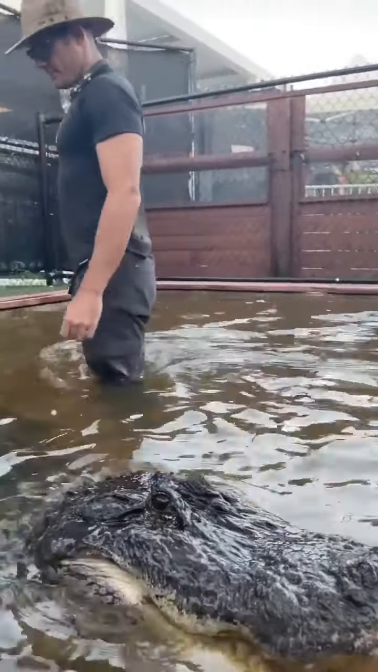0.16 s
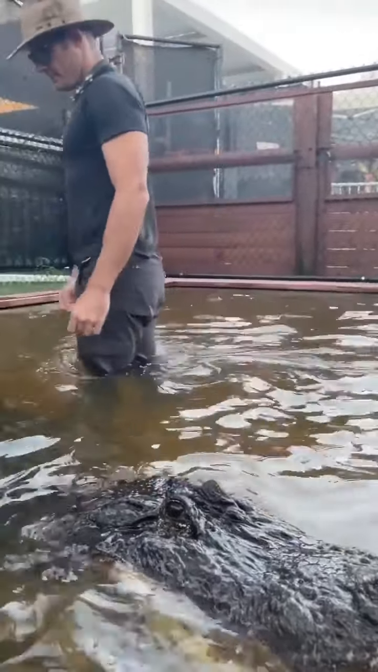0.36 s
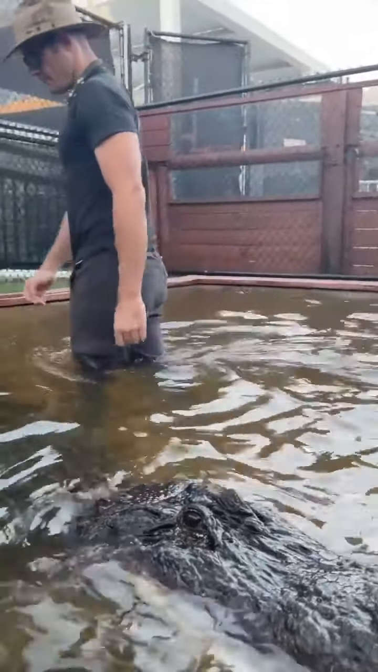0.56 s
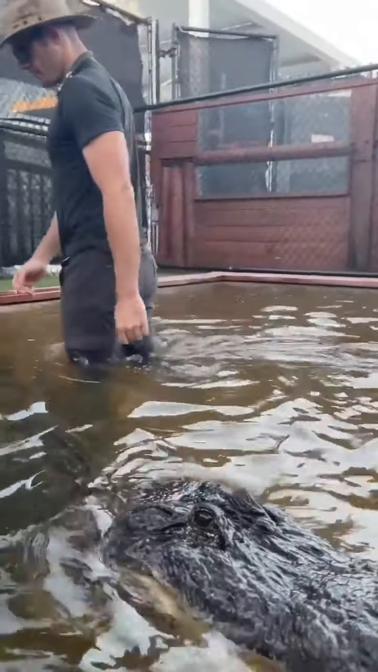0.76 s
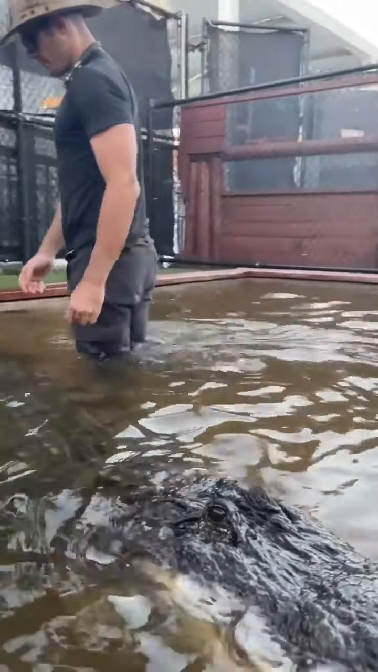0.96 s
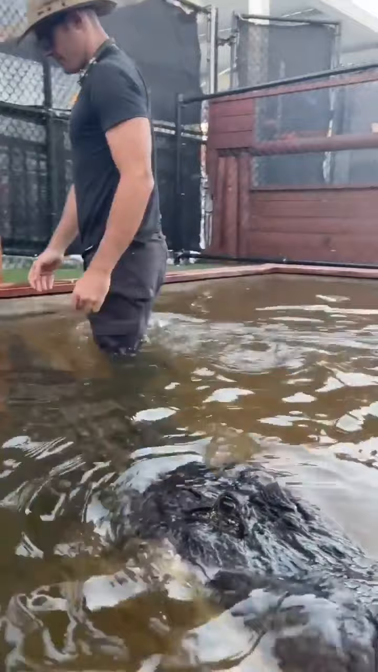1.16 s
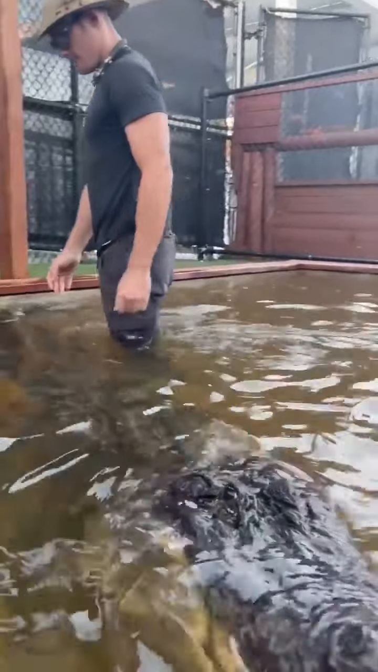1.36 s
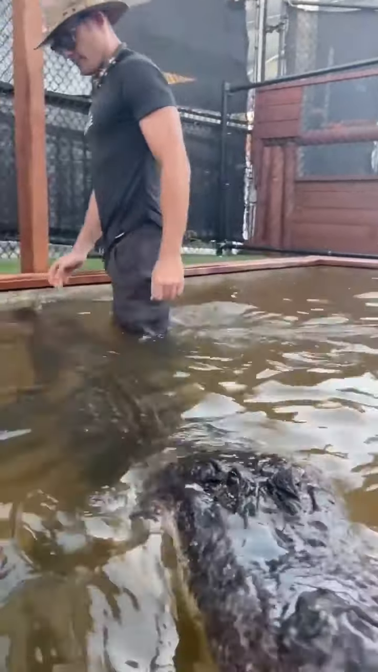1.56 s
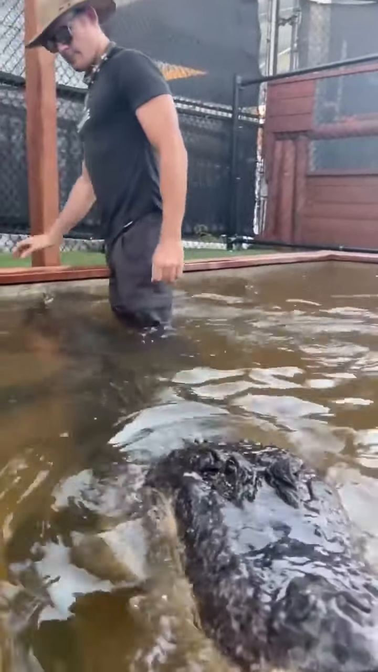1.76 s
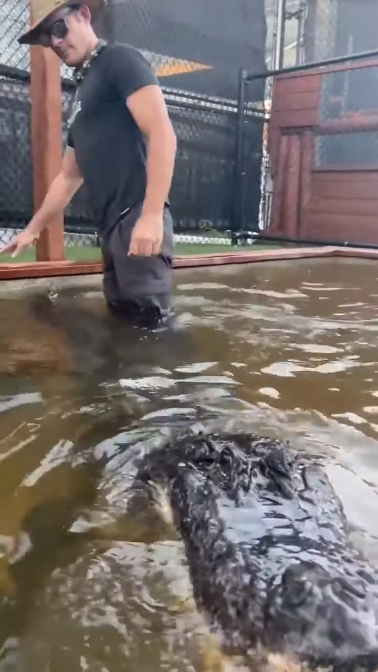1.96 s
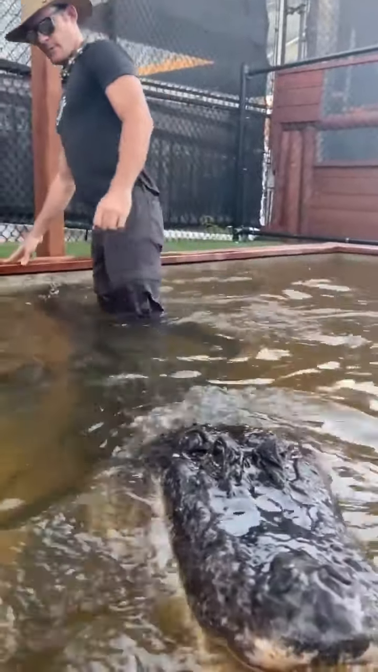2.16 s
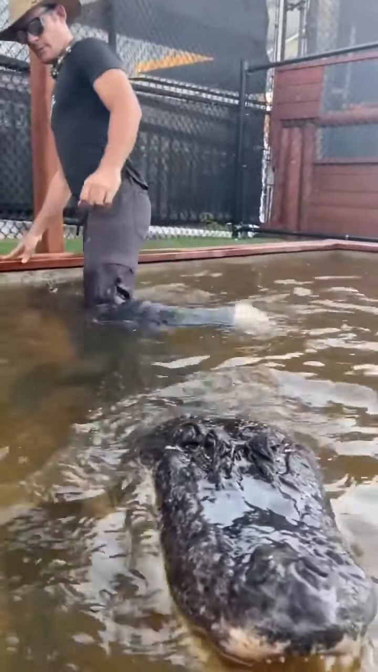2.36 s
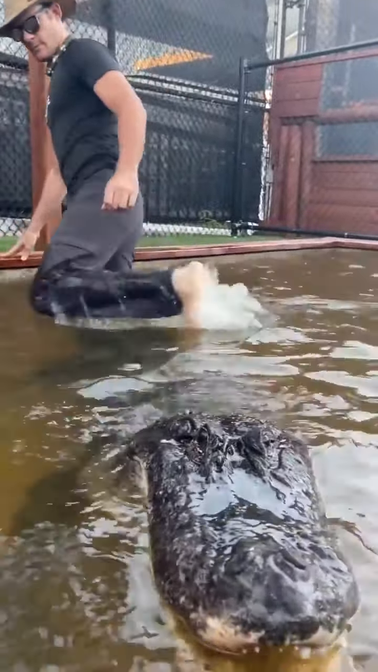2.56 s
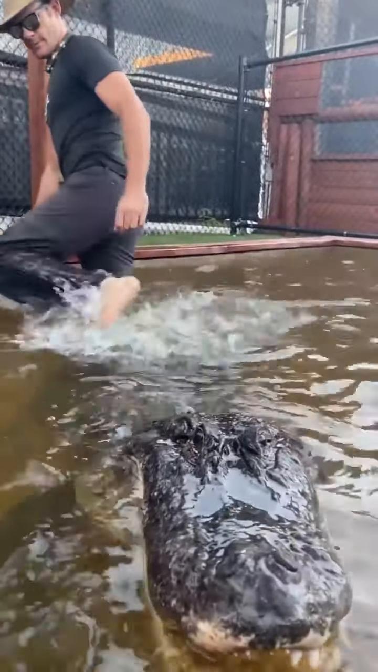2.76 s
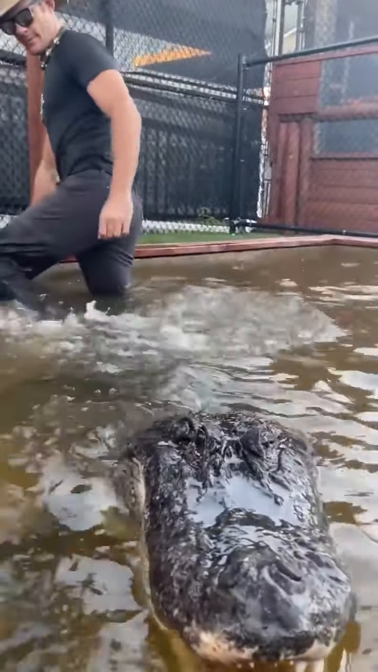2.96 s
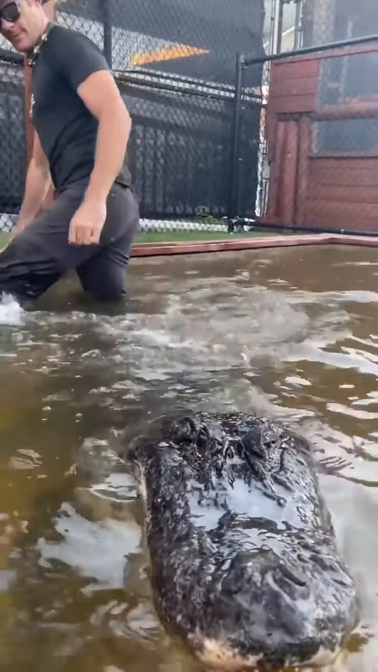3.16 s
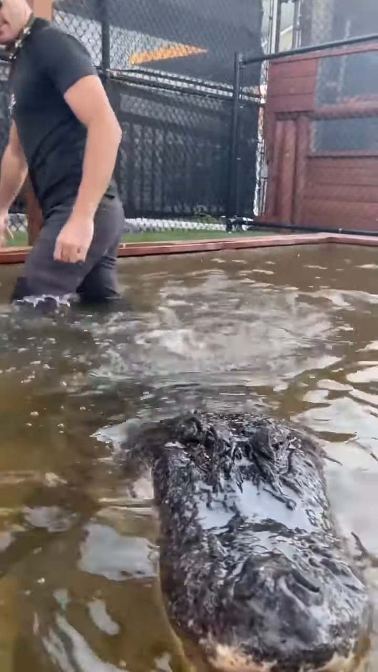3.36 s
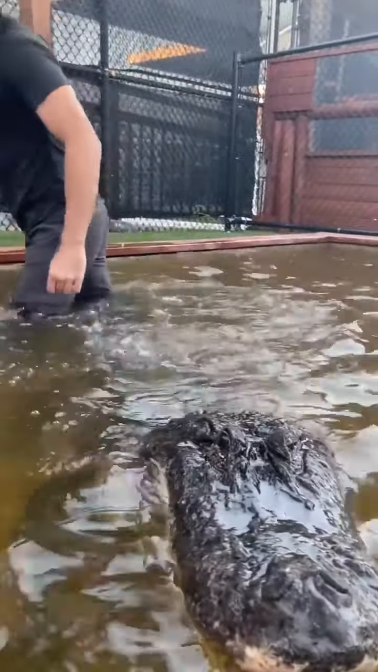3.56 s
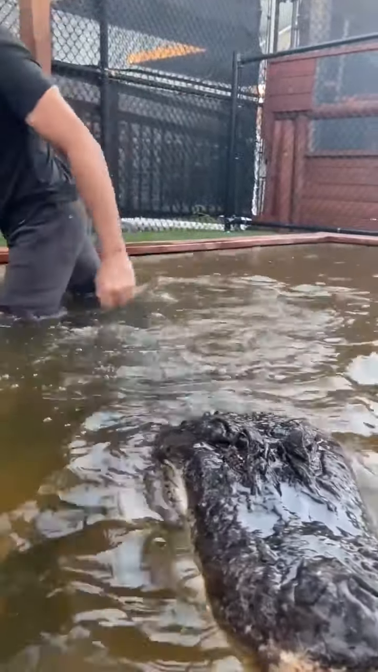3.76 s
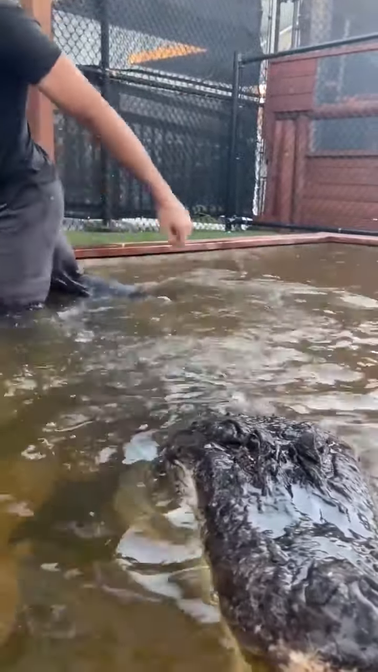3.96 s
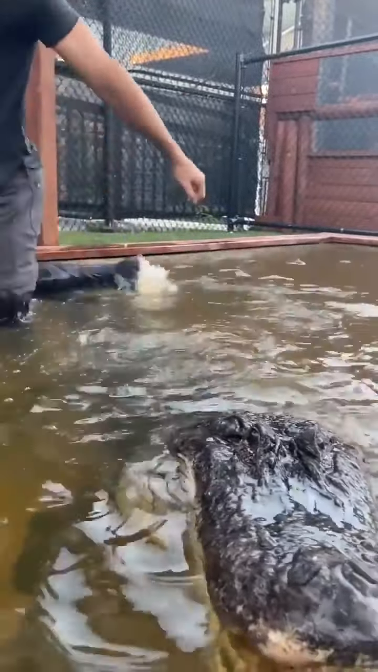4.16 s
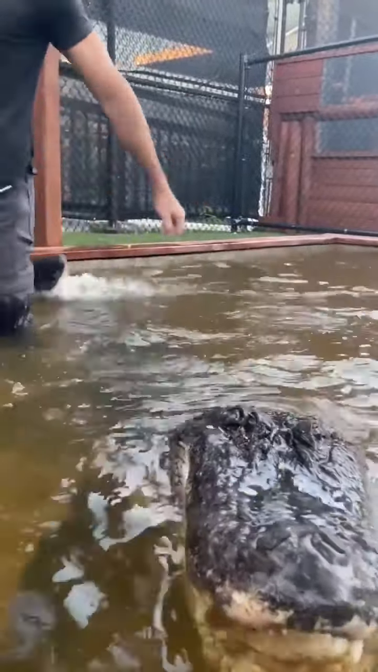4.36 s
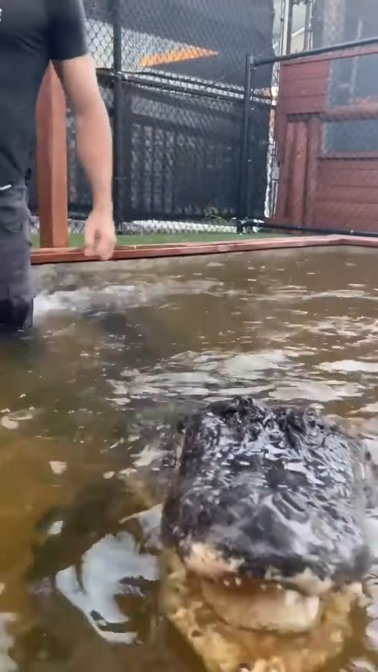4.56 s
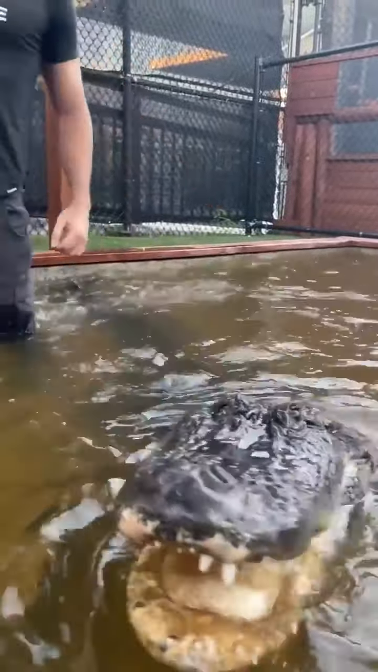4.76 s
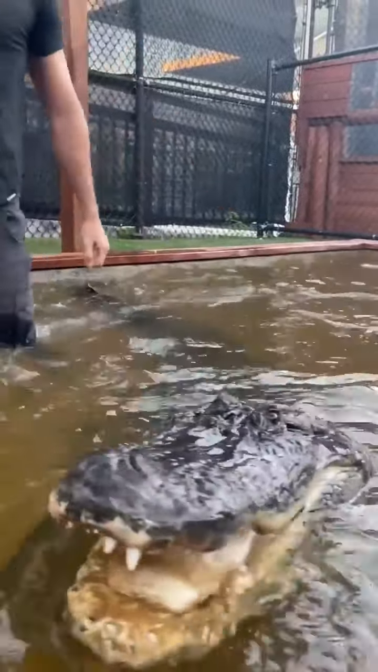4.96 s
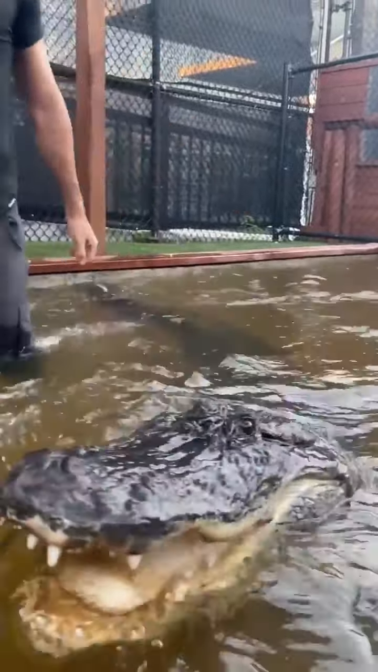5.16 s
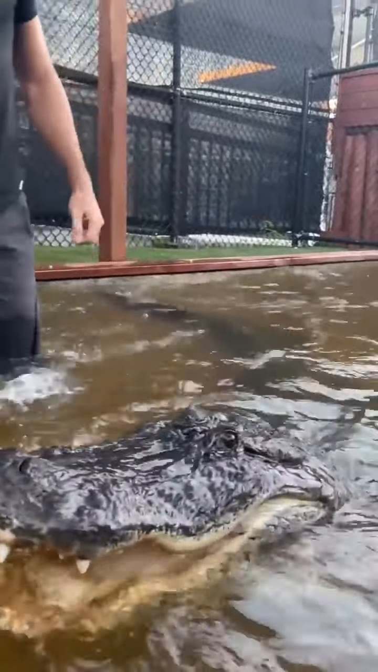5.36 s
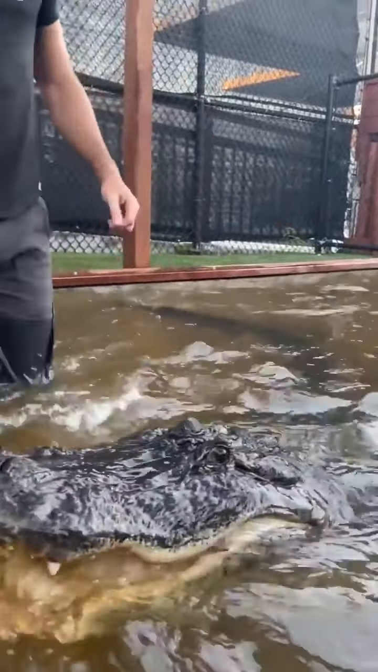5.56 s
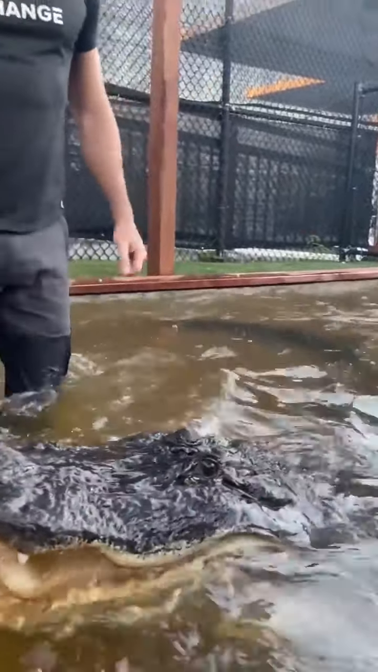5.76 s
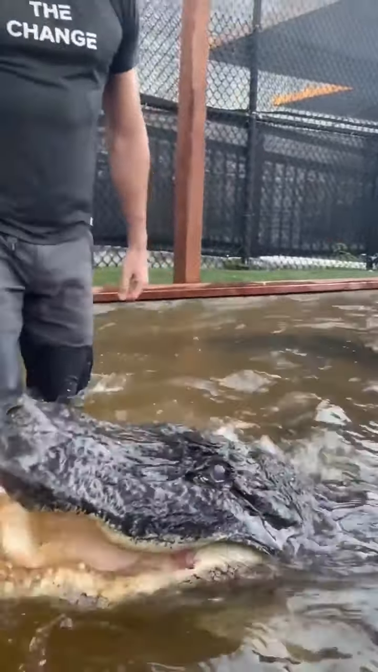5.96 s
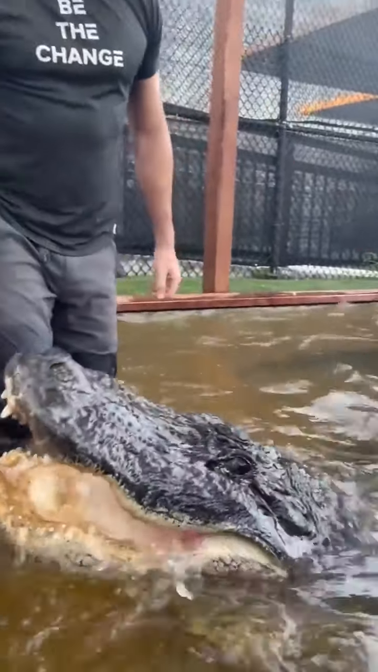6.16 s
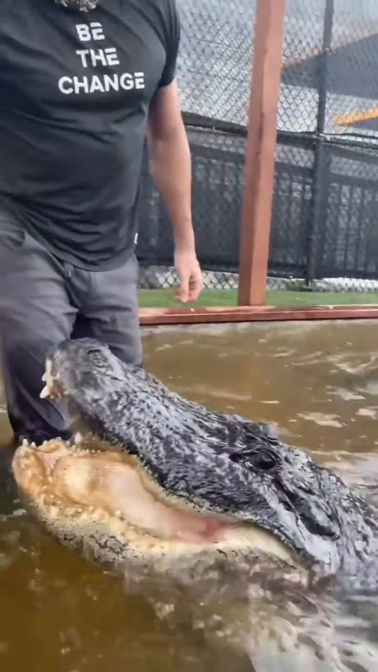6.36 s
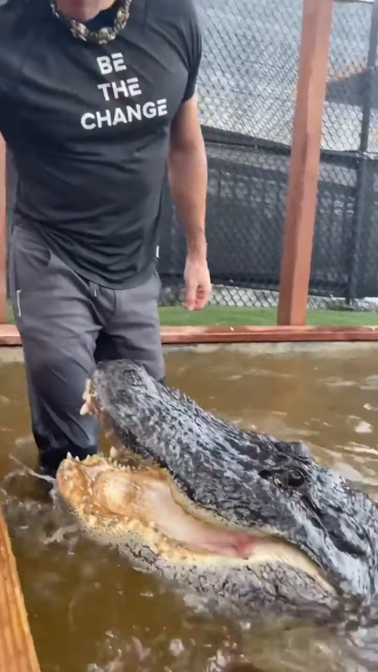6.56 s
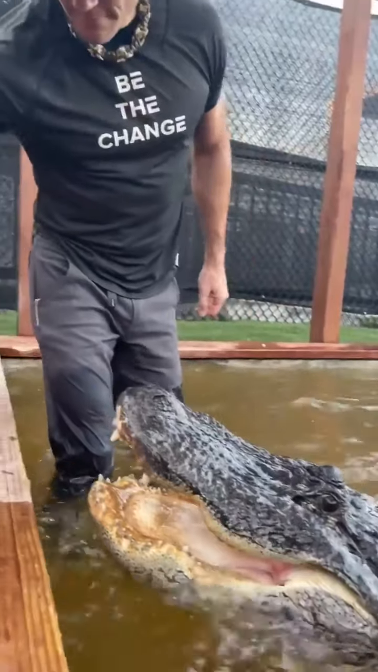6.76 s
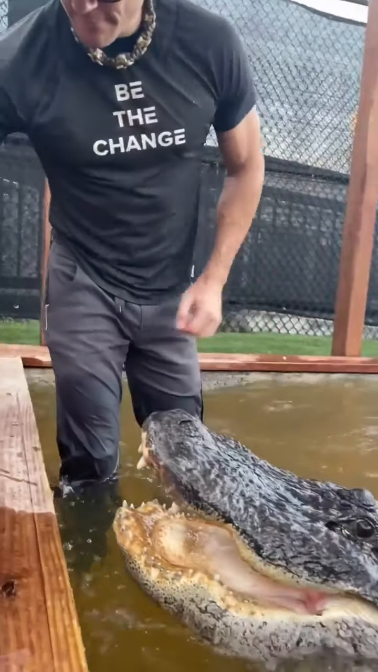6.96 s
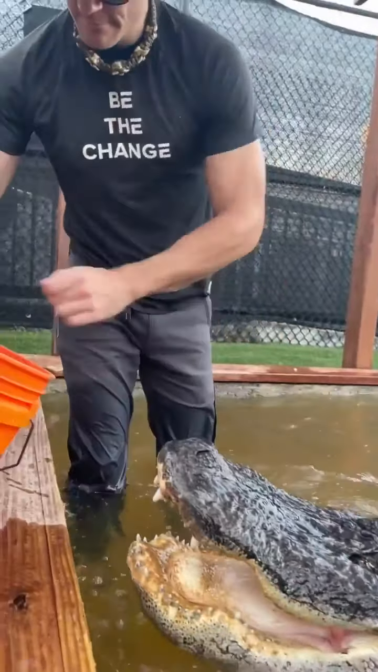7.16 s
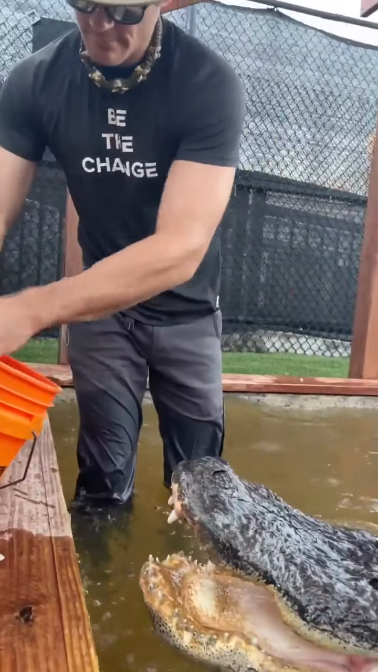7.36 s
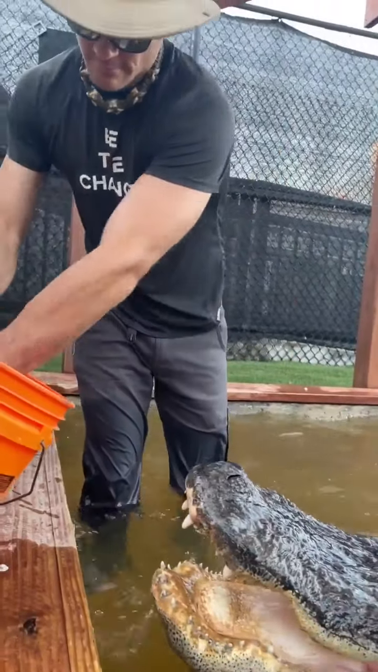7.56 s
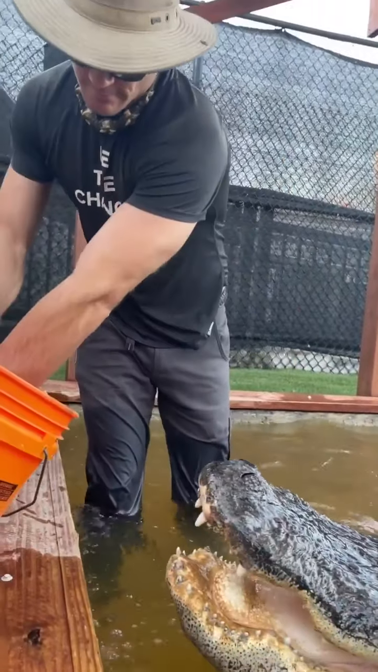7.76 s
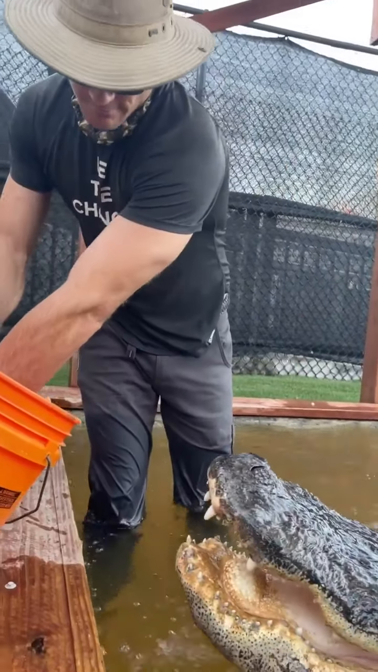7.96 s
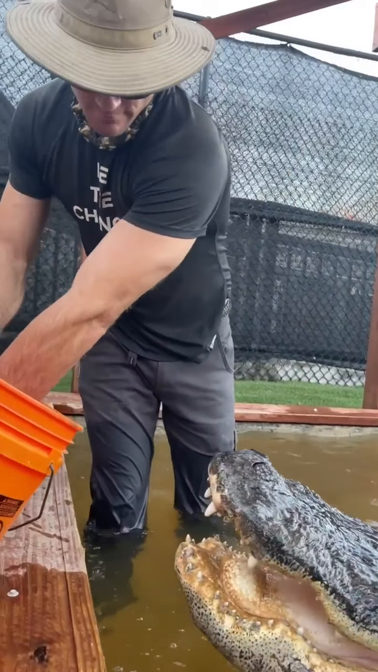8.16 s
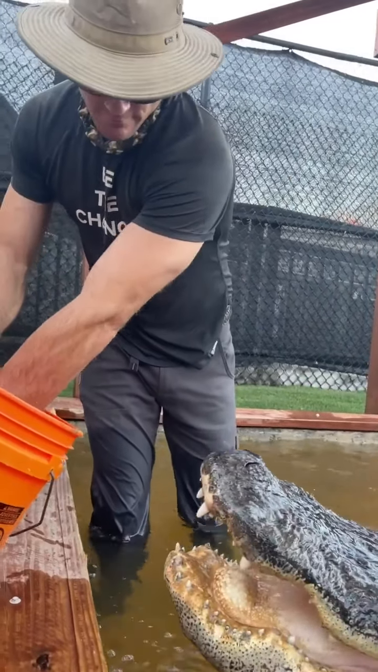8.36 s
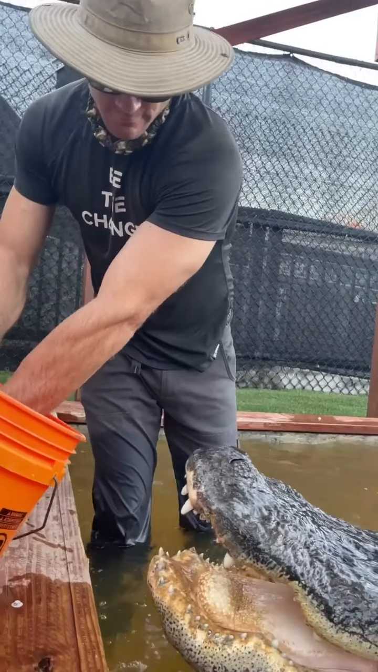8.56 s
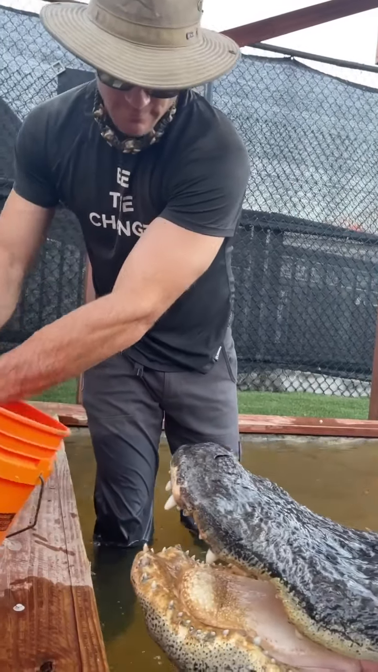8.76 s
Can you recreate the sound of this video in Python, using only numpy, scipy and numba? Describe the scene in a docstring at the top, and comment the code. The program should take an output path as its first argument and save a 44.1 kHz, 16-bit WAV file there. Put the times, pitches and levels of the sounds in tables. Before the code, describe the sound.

Close water sloshes, gurgles and splashes as a person and a large reptile move in a pool, with two hollow knocks late on.

```python
"""Wading beside a large reptile

A person wades through a shallow outdoor pool beside a large reptile, a metre or two from a phone.
Moving legs and jaws stir up swarms of bubbles, fizz and spray; single slaps and drips ring trapped air.
Something hollow is knocked twice and a hand rustles in a bucket. Fence and pool walls add a short echo;
distant traffic and a motor rumble under a thin outdoor hiss."""
import sys
import numpy as np
from scipy import signal
from scipy.fft import rfft, irfft, next_fast_len
from scipy.io import wavfile
from scipy.ndimage import uniform_filter1d
from numba import njit

SR = 44100
rng = np.random.default_rng(int(sys.argv[2]) if len(sys.argv) > 2 else 0)


def wav_out(sig):
    """Save sig, one row per channel (or a flat mono array), as 16-bit PCM at SR to the path in sys.argv[1]."""
    wavfile.write(sys.argv[1], SR, np.round(np.clip(np.atleast_2d(sig).T, -1, 1) * 32767).astype(np.int16))


N = 388079
WATER_PAN_DB = -2  # left minus right: the bubbles sit a little to the right
ANTIPHASE = np.array([[1], [-1]])


def undb(db):
    """Decibels to gain."""
    return 10 ** (np.asarray(db) / 20)


def level(x, db):
    """Scale to an rms level."""
    return x * undb(db) / np.sqrt(np.mean(x ** 2))


def crest(x, db):
    """Scale a burst so that its loudest millisecond has this rms level."""
    return x * undb(db) / np.sqrt(uniform_filter1d(x ** 2, SR // 1000).max())


def colour(x, curve):
    """EQ through points of f/Hz, gain/dB, joined on a log-frequency axis."""
    size = next_fast_len(x.shape[-1])
    hz, db = np.transpose(curve)
    bin_hz = np.arange(size // 2 + 1) * SR / size
    gain = undb(np.interp(np.log(bin_hz + 1), np.log(hz), db))
    return irfft(rfft(x, size) * gain, size)[..., :x.shape[-1]]


def band(x, lo_hz, hi_hz, order=2):
    """Butterworth band-pass."""
    sos = signal.butter(order, [lo_hz, min(hi_hz, .45 * SR)], "band", fs=SR, output="sos")
    return signal.sosfilt(sos, x)


def drift(rate_hz):
    """Smooth random modulator: sample-and-hold, slewed twice, with a spread near 1."""
    hold = int(SR / rate_hz)
    steps = np.repeat(rng.standard_normal(N // hold + 1), hold)
    return 1.38 * uniform_filter1d(uniform_filter1d(steps, hold), hold)[:N]


@njit
def ring(onset_s, hz, t60, rise, left, right, lead_rad, attack):
    """Damped stereo sines; attack is a share of t60, rise the share the pitch climbs over t60."""
    out = np.zeros((2, N))
    for k in range(len(onset_s)):
        span, start = t60[k] * SR, int(onset_s[k] * SR)
        phasor = 1 + 0j
        step = np.exp(2j * np.pi * hz[k] / SR - np.log(1000) / span)
        bend = np.exp(2j * np.pi * hz[k] * rise[k] / SR / span)
        left_turn = np.exp(1j * lead_rad[k])
        for i in range(min(int(.8 * span), N - start)):
            tone = phasor * min(i / (attack * span), 1.)
            out[0, start + i] += left[k] * (tone * left_turn).imag
            out[1, start + i] += right[k] * tone.imag
            phasor *= step
            step *= bend
    return out


def traffic():
    """Distant traffic: a low mono rumble that barely swells."""
    # rumble spectrum: f/Hz, relative density/dB
    spectrum = [(13, -36), (28, -17), (45, 3), (90, -0.5), (130, -6.5), (210, -17.5), (320, -21),
                (500, -65)]
    return level(colour(rng.standard_normal(N), spectrum), db=-37) * undb(0.096 * drift(0.24))


def motor():
    """A distant motor hums one low tone that wavers in pitch and flutters in level."""
    hz = 95.4 * (1 + 0.01514 * drift(2.7))
    return np.sin(2 * np.pi * np.cumsum(hz) / SR) * undb(-45 + drift(28.0))


def outdoor_hiss():
    """A thin, wide bed of air that sways gently in level."""
    # hiss spectrum: f/Hz, relative density/dB
    spectrum = [(250, 4.5), (500, -6), (1000, -13.5), (2500, -9), (6000, -27), (13000, -22)]
    mid, side = colour(rng.standard_normal((2, N)), [(100, -36)] + spectrum)
    return level(mid + 1.3 * side * ANTIPHASE, db=-52.5) * undb(1.5 * drift(1.667))


def fence_echo(x, t60=0.11, predelay_s=.004, send_db=-7):
    """Fence and pool walls send back a short, dull, scattered echo, different on each side."""
    t = np.arange(int(.3 * SR)) / SR
    mid, side = rng.standard_normal((2, len(t)))
    tail = (mid + side * ANTIPHASE) * np.exp(-t * np.log(1000) / t60) * (t > predelay_s)
    tail /= np.sqrt(np.sum(tail ** 2, axis=1, keepdims=True))
    return undb(send_db) * signal.fftconvolve(band(x, 136, 3730, order=1), tail, axes=1)[:, :N]


def bucket(fade_s=0.013):
    """A hand scrapes unevenly, left of centre; the plastic wall adds one broad resonance."""
    # rustles: start/s, end/s, resonance/Hz, level/dB
    rustles = [(7.54, 7.68, 3580, -51), (8.272, 8.41, 2350, -59.5), (8.694, 8.817, 3480, -55)]
    out, t = 0, np.arange(N) / SR
    for start, end, hz, db in rustles:
        touch = np.clip(np.minimum(t - start, end - t) / fade_s, 0, 1) * undb(3.9 * drift(70))
        out = out + touch * level(band(rng.standard_normal(N), 0.84 * hz, 1.22 * hz), db)
    return out * undb([[1.5], [-1.5]])


def knocks():
    """Two knocks, the second a flam; each blow rings the same hollow body a little differently."""
    # blows: t/s, level/dB
    blows = [(6.928, -22), (6.974, -15), (6.981, -22)]
    # modes of the hollow body: f/Hz, gain/dB, t60/s
    modes = [(793, -11.5, 0.061), (1120, 0, 0.028), (1450, 2, 0.026), (1730, -3, 0.03), (2210, 1, 0.035),
             (2360, 0, 0.029), (2720, -10, 0.043)]
    hz, mode_db, t60 = np.tile(np.transpose(modes), len(blows))
    onset_s, blow_db = np.repeat(np.transpose(blows), len(modes), axis=1)
    detune, accent = rng.standard_normal((len(hz), 2)).T
    gain = undb(mode_db + blow_db + 2.5 * accent)
    zero = np.zeros(len(hz))
    return ring(onset_s, hz * (1 + 0.058 * detune), t60, zero, gain, gain, zero, attack=0.025)


def bloops():
    """Cavities fill and close: each note swells and fades as it sweeps up, evenly in octaves."""
    # closing cavities: t/s, length/s, first f/Hz, last f/Hz, peak/dB
    cavities = [(0.801, 0.027, 1110, 1640, -36.5), (1.035, 0.044, 597, 2210, -42),
                (1.242, 0.026, 930, 1650, -33.5), (1.336, 0.032, 952, 2020, -37.5),
                (2.467, 0.08, 291, 423, -29.5), (2.837, 0.03, 595, 915, -29.5),
                (5.323, 0.026, 1140, 1453, -29), (7.495, 0.04, 523, 1870, -42.5)]
    out = np.zeros(N)
    for onset_s, length_s, first_hz, last_hz, db in cavities:
        progress = np.linspace(0, 1, int(length_s * SR))
        hz = first_hz * (last_hz / first_hz) ** progress
        envelope = undb(db) * np.sin(np.pi * progress) ** .5
        i = int(onset_s * SR)
        out[i:i + len(hz)] += envelope * np.sin(2 * np.pi * np.cumsum(hz) / SR)
    return out * undb([[WATER_PAN_DB / 2], [-WATER_PAN_DB / 2]])


def air_pockets():
    """Trapped air rings at the pitch of its size and chirps upward as it nears the surface."""
    # single pockets and drips: t/s, f/Hz, level/dB, t60/s
    pockets = [(0.182, 1690, -33.5, 0.11), (0.349, 1570, -16, 0.0097), (0.357, 540, -14, 0.022),
               (0.569, 1280, -20, 0.014), (0.608, 1720, -14.5, 0.0074), (0.809, 520, -37, 0.11),
               (0.91, 392, -22, 0.014), (0.93, 520, -34, 0.12), (1.199, 504, -24, 0.04),
               (1.236, 573, -19, 0.028), (1.42, 620, -31, 0.11), (1.443, 1295, -24.5, 0.048),
               (1.5, 750, -34, 0.081), (1.968, 1820, -24, 0.016), (2.062, 1200, -20, 0.017),
               (2.187, 1320, -25, 0.026), (2.275, 755, -25.5, 0.091), (2.426, 1520, -26, 0.021),
               (2.578, 538, -11, 0.052), (2.68, 475, -14, 0.063), (2.752, 2000, -18, 0.039),
               (2.75, 1210, -20.5, 0.1), (3.133, 432, -17.5, 0.079), (3.232, 527, -17.5, 0.032),
               (3.238, 326, -20, 0.1), (3.301, 300, -13, 0.0093), (3.41, 530, -18.5, 0.038),
               (3.67, 687, -18, 0.027), (4.101, 432, -32.5, 0.11), (4.165, 1290, -16, 0.016),
               (4.303, 2450, -20, 0.046), (4.35, 1270, -17, 0.034), (4.365, 440, -15, 0.048),
               (4.62, 1530, -14, 0.027), (4.61, 192, -21, 0.052), (4.692, 220, -23.5, 0.17),
               (4.787, 660, -14.5, 0.028), (4.82, 630, -11.5, 0.035), (4.845, 606, -21, 0.032),
               (4.876, 580, -9, 0.021), (4.94, 586, -12.5, .04), (4.9, 363, -12.5, 0.046),
               (5.274, 563, -25, 0.087), (5.636, 655, -17, 0.039), (5.664, 625, -19.5, 0.037),
               (5.855, 680, -13, 0.048), (5.859, 1005, -12.5, 0.027), (5.9, 470, -20, 0.038),
               (5.928, 1160, -29, 0.043), (6.024, 1410, -22, 0.041), (6.3, 600, -30, 0.095),
               (5.967, 475, -26, 0.11), (5.975, 728, -18.5, 0.083), (6.131, 577, -11.5, 0.043),
               (6.211, 356, -24.5, 0.11), (6.487, 616, -24, 0.066), (6.501, 1390, -12, 0.016),
               (6.559, 348, -9.5, 0.034), (6.642, 1520, -23, 0.019), (6.66, 1750, -26, 0.015),
               (6.875, 1060, -33, 0.024), (6.718, 1920, -30.5, 0.029), (6.933, 1060, -21, 0.035),
               (7.06, 1370, -35, 0.11), (7.721, 470, -33, 0.029), (7.16, 787, -31, 0.074),
               (7.221, 975, -34, 0.055), (7.624, 1120, -27, 0.017), (7.815, 1010, -30, 0.05),
               (7.858, 1900, -33, 0.022), (7.884, 1930, -25, 0.023), (7.884, 1270, -34, 0.082),
               (7.938, 1860, -33, 0.032), (8.065, 1890, -35.5, 0.026)]
    onset_s, hz, db, t60 = np.transpose(pockets)
    rise, in_phase = np.full(len(hz), 0.29), np.zeros(len(hz))
    left, right = undb(db + WATER_PAN_DB / 2), undb(db - WATER_PAN_DB / 2)
    return ring(onset_s, hz, np.clip(t60, .01, .4), rise, left, right, in_phase, attack=0.055)


def slaps(fade_in_s=.004, smack_cycles=1.55, spatter_s=0.00076, spread=1.383):
    """Breaking water: a sharp smack and a bright spatter, with a short trail of droplets."""
    # slaps: t/s, smack level/dB, spatter level/dB, smack centre/Hz
    hits = [(0.03, -42.5, -42, 5260), (0.087, -54, -47, 5580), (0.185, -28.5, -34, 1600),
            (0.264, -30, -42, 3620), (0.28, -29, -34, 4100), (0.562, -34, -35, 2610),
            (0.566, -26, -47, 3640), (0.623, -28.5, -32.5, 3350), (0.971, -35, -65, 2620),
            (1.221, -37, -59, 1980), (1.255, -23, -28.5, 3640), (1.396, -29, -36.5, 3800),
            (1.433, -25.5, -28.5, 2570), (1.485, -26, -40, 3300), (1.555, -39, -49, 2400),
            (1.588, -30.5, -39, 5070), (1.629, -30, -59, 1366), (1.652, -30.5, -30, 1700),
            (1.677, -23, -28.5, 4300), (1.699, -28, -36, 3120), (1.713, -30.5, -46, 1500),
            (1.812, -33.5, -62, 2530), (1.885, -32, -35, 2980), (2.06, -25.5, -33.5, 4140),
            (2.357, -31.5, -62, 3670), (2.489, -24, -40, 955), (2.718, -20, -24.5, 4550),
            (3.165, -24.5, -32, 1180), (3.233, -19, -52, 3100), (3.299, -22.5, -54, 782),
            (3.67, -39, -47, 885), (3.835, -38, -46, 2000), (5.142, -19, -21, 2780),
            (5.665, -21.5, -20.5, 1700), (5.789, -34, -35.5, 3040), (5.85, -20.5, -30, 2580),
            (5.856, -23.5, -33, 2440), (5.938, -25.5, -35, 4000), (5.997, -23.5, -22, 3700),
            (6.023, -25.5, -24, 3020), (6.092, -23, -35, 3800), (6.126, -23, -30, 1210),
            (6.152, -23.5, -23, 4530), (6.305, -29, -43, 1950), (6.401, -29, -44.5, 2720),
            (6.5, -24, -31, 3330), (6.505, -22.5, -43, 3130), (6.557, -15.5, -37, 5300),
            (6.558, -10.5, -15, 3550), (6.875, -29.5, -55, 985), (6.888, -30, -41, 3680),
            (6.898, -31.5, -47, 4200), (6.932, -25.5, -43, 2300), (6.974, -20, -48, 3730),
            (7.086, -31, -49, 3680), (7.222, -31, -41, 1010), (7.677, -42, -44, 1200),
            (7.884, -31.5, -48, 2000), (8.024, -35.5, -38, 5300), (8.219, -65, -41, 1210)]
    out, t = np.zeros((2, N)), np.arange(4096) / SR
    since_break = np.maximum(t - fade_in_s + 0.00095, 0)
    trail = undb(-10) * np.minimum(t / fade_in_s, 1) ** 2 * np.exp(-since_break / 0.0064)

    def envelope(decay_s):
        return (since_break / decay_s) ** 2 * np.exp(-since_break / decay_s) + trail

    for hit_s, smack_db, spatter_db, hz in hits:
        mid, side = rng.standard_normal((2, len(t)))
        smack = band(mid * envelope(smack_cycles / hz), hz / spread, hz * spread)  # deeper lasts longer
        spatter = band((mid + 0.5 * side * ANTIPHASE) * envelope(spatter_s), 4600, .45 * SR)
        burst = crest(smack, smack_db) + crest(spatter, spatter_db)
        i = int((hit_s - fade_in_s) * SR)
        out[:, i:i + len(t)] += burst[:, :N - i]
    return out


def agitation(build_db=20.5):
    """Gurgle, fizz and spray envelopes in dB: each slosh builds, holds and settles over the ripples."""
    # ripples that never stop: t/s, gurgle/dB, fizz/dB, spray/dB
    ripples = [(0, -70, -58.5, -71), (2.3, -58.5, -55, -61), (3.9, -54.5, -56, -58),
               (5.698, -55.5, -45, -49), (6.8, -57, -55, -54), (7.5, -53.5, -57.5, -57.5),
               (8.1, -63, -69, -62), (8.8, -56.5, -61, -65)]
    # sloshes of legs, body and jaws: t/s, build-up/s, hold/s, gurgle/dB, fizz/dB, spray/dB
    sloshes = [(0.0, 0.014, 0.01, -53, -49, -58), (0.166, 0.015, 0.032, -56, -54.5, -56),
               (0.307, 0.016, 0.11, -51, -52, -53), (0.541, 0.014, 0.011, -38.5, -46.5, -53),
               (0.744, 0.045, 0.044, -51, -46, -53.5), (0.907, 0.03, 0.21, -48.5, -48, -58.5),
               (1.188, 0.039, 0.069, -37, -40, -47.5), (1.369, 0.023, 0.12, -49.5, -45.5, -50),
               (1.572, 0.079, 0.055, -48.5, -49, -50.5), (1.906, 0.039, 0.018, -57, -47, -47.5),
               (2.037, 0.019, 0.0072, -46.5, -62, -53), (2.335, 0.023, 0.031, -53, -57.5, -57),
               (2.459, 0.072, 0.048, -27.5, -30.5, -41), (2.533, 0.051, 0.22, -29.5, -30, -35),
               (2.82, 0.034, 0.22, -40.5, -37.5, -44), (3.061, 0.1, 0.019, -32.5, -31.5, -40.5),
               (3.232, 0.058, 0.24, -45.5, -39, -48), (3.622, 0.043, 0.03, -46.5, -41.5, -53),
               (4.121, 0.083, 0.2, -32.5, -30.5, -39.5), (4.443, 0.059, 0.21, -32, -31, -36),
               (4.747, 0.039, 0.18, -27.5, -32, -36), (4.963, 0.038, 0.14, -33.5, -31, -36.5),
               (5.209, 0.058, 0.057, -39, -35, -42), (5.43, 0.064, 0.066, -51, -47.5, -50.5),
               (5.818, 0.034, 0.044, -34, -33, -40), (5.948, 0.031, 0.11, -61, -42.5, -46),
               (6.078, 0.049, 0.085, -37.5, -34.5, -38.5), (6.262, 0.023, 0.088, -52, -38.5, -41),
               (6.476, 0.033, 0.03, -44.5, -43, -44.5), (6.616, 0.017, 0.03, -66, -45, -50.5),
               (6.852, 0.015, 0.054, -46.5, -43.5, -65.5), (7.035, 0.037, 0.12, -58, -46, -52),
               (7.587, 0.099, 0.13, -66, -53.5, -77), (7.796, 0.071, 0.085, -70, -47, -45.5)]
    # release after a slosh: gurgle/(dB/s), fizz/(dB/s), spray/(dB/s)
    settle_rates = [135, 93.5, 109]
    t = np.arange(0, N + 64, 64) / SR
    ripple_s, *ripple_db = np.transpose(ripples)
    power = np.array([undb(np.interp(t, ripple_s, db)) ** 2 for db in ripple_db])
    for start, build, hold, *db in sloshes:
        top = start + build
        attack_db = build_db * np.maximum(top - t, 0) / build
        release_db = np.outer(settle_rates, np.maximum(t - top - hold, 0))
        power += undb(np.array(db)[:, None] - attack_db - release_db) ** 2
    return [np.interp(np.arange(N) / SR, t, 10 * np.log10(layer)) for layer in power]


def swarm(db, lo_hz, hi_hz, count, cycles, rise, scatter_db, width_db, calm_share, port_gap_s=.00005):
    """Bubbles of random size and place follow the envelope db; calmer water rings fewer of them."""
    when, size_a, size_b, place, life, loudness, chance = rng.random((count, 7)).T
    onset = (when * (N - 1)).astype(int)
    density = np.clip(undb(db - db.max() + 12.5), calm_share, 1)[onset]
    accent_db = np.minimum(-scatter_db * np.log(1 - loudness), 3.9 * scatter_db)
    gain = (chance < density) / np.sqrt(density) * undb(accent_db)
    gain *= undb(db)[onset] / np.sqrt(np.mean(gain ** 2))
    hz = lo_hz * (hi_hz / lo_hz) ** ((size_a + size_b) / 2)  # middle sizes are the most common
    t60 = cycles * (0.55 + 2.19 * life ** 2) / hz
    gain /= np.sqrt(count * SR / N * np.mean(t60) / 40)  # summed power of overlapping rings
    bearing = 2 * place - 1
    pan_db = WATER_PAN_DB + width_db * bearing
    left, right = gain * undb(pan_db / 2), gain * undb(-pan_db / 2)
    # the nearer microphone port leads; the phase gap levels off in the treble
    lead_rad = 2 * np.pi * np.minimum(hz, 3500) * port_gap_s * bearing
    return ring(onset / SR, hz, t60, rise * life, left, right, lead_rad, attack=0.052)


def stirred_water():
    """Large pockets gurgle, small bubbles fizz, droplets crackle as spray, all in the same clumps."""
    gurgle_db, fizz_db, spray_db = agitation()
    clumps = drift(30)
    gurgle = swarm(gurgle_db + 1.8 * clumps, lo_hz=255.8, hi_hz=1497, count=12000,
                   cycles=14.1, rise=0.31, scatter_db=5.0, width_db=6.5, calm_share=.6)
    fizz = swarm(fizz_db + 1.8 * clumps, lo_hz=658.0, hi_hz=6360, count=18000,
                 cycles=25.3, rise=0.43, scatter_db=2.0, width_db=3, calm_share=.2)
    spray = swarm(spray_db + 0.86 * clumps, lo_hz=2670, hi_hz=19440, count=60000,
                  cycles=78, rise=0.063, scatter_db=-0.5, width_db=-4.5, calm_share=0.35)
    return gurgle + fizz + spray


def scene():
    """Water, knocks and bucket up close, with their echo, over the outdoor bed."""
    near = stirred_water() + air_pockets() + bloops() + slaps() + knocks() + bucket()
    return near + fence_echo(near) + traffic() + motor() + outdoor_hiss()


def record(dry, left_trim_db=0.96, top_hz=14650):
    """The phone's two ports differ in phase and level; the bass narrows, the housing tints the treble."""
    # paths round the housing to the ports: f/Hz, left phase lead/rad
    port_phase = [(200, 0), (750, -.9), (1750, 0), (3100, 1.2), (4100, 1.6), (4800, 3.1), (5700, 6.2),
                  (6400, 6.3), (8200, 9.3), (9400, 9.5), (10000, 13), (11000, 15.7), (12200, 18.8)]
    # stereo width: f/Hz, side gain/dB
    width = [(60, -30), (150, -24), (320, -6.5), (500, -3), (1100, 3.5), (1750, -37), (2500, -3),
             (4800, -0.5), (9000, 2), (12000, -1)]
    # microphone colour: f/Hz, gain/dB
    mic_eq = [(20, -4.5), (5000, -3), (7300, -0.5), (9000, -1.5), (10200, 8), (12300, 2.5), (13200, -36),
              (14200, -31)]
    size = next_fast_len(N)
    hz, lead_rad = np.transpose(port_phase)
    turn = np.exp(.5j * np.interp(np.arange(size // 2 + 1) * SR / size, hz, lead_rad))
    left, right = irfft(rfft(dry, size) * np.array([turn, 1 / turn]), size)[:, :N]
    left = left * undb(left_trim_db)
    mid, side = (left + right) / 2, colour((left - right) / 2, width)
    stereo = colour(np.array([mid + side, mid - side]), mic_eq)
    return signal.sosfilt(signal.ellip(8, .2, 70, top_hz, fs=SR, output="sos"), stereo)


dry = scene()
out = record(dry)
wav_out(out)
```